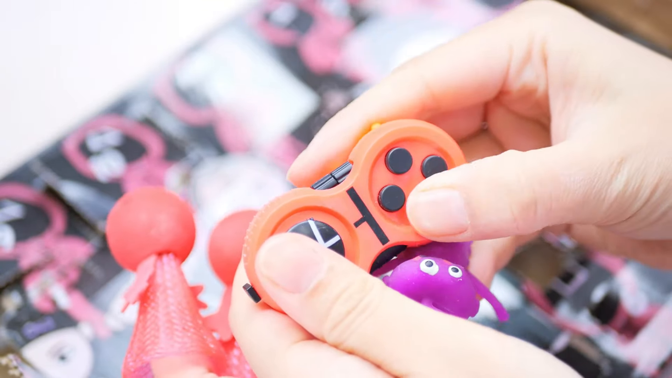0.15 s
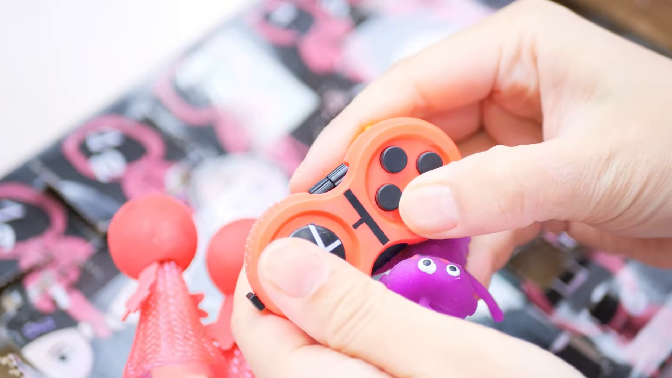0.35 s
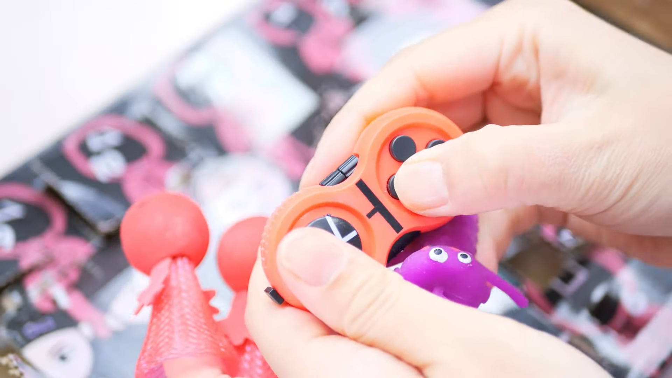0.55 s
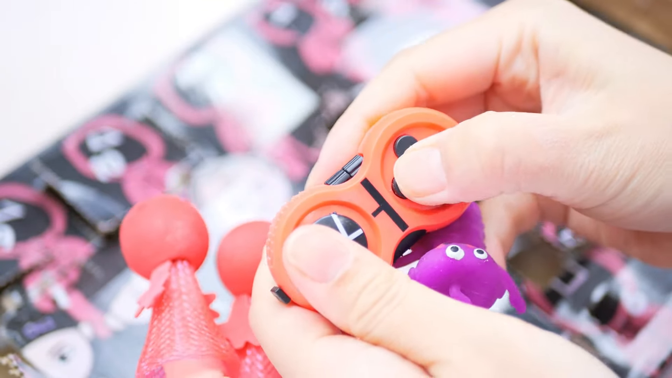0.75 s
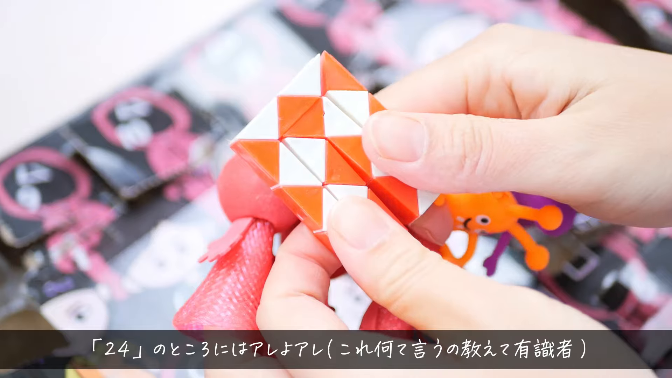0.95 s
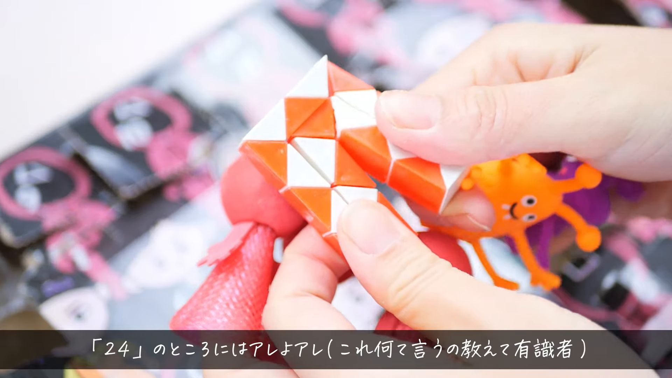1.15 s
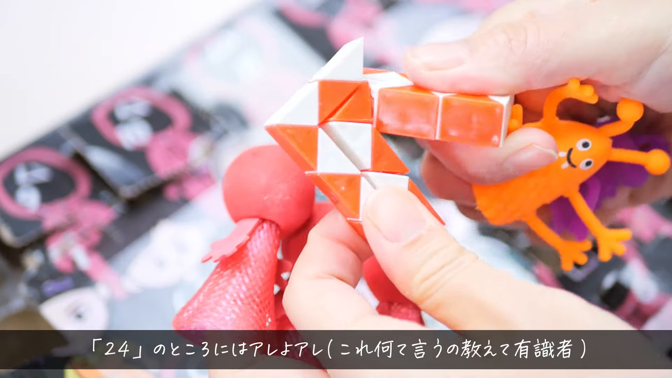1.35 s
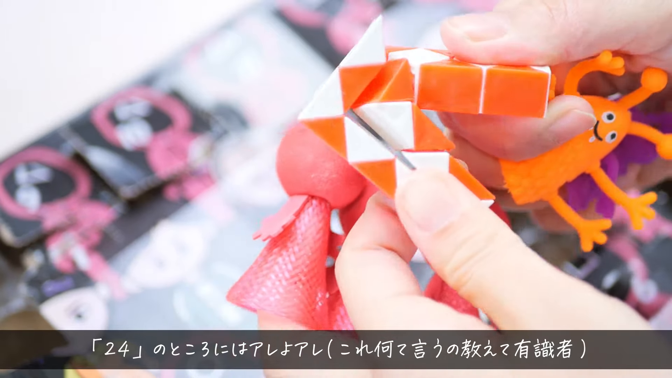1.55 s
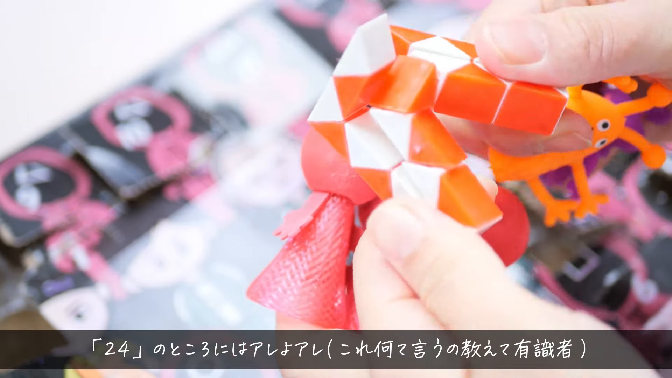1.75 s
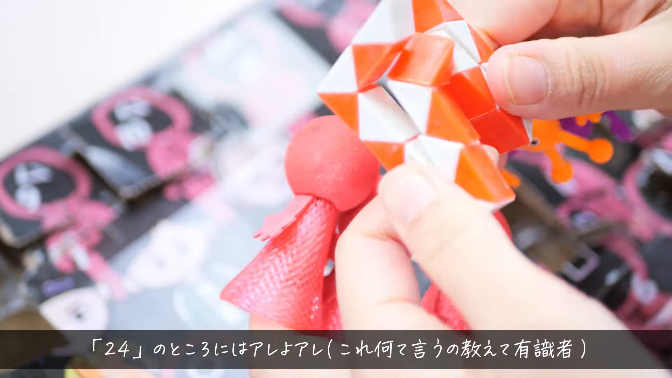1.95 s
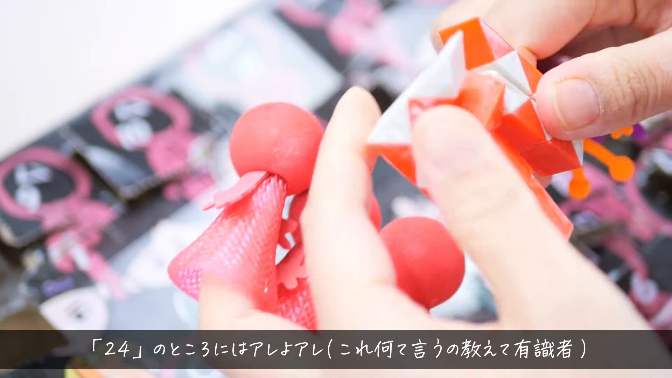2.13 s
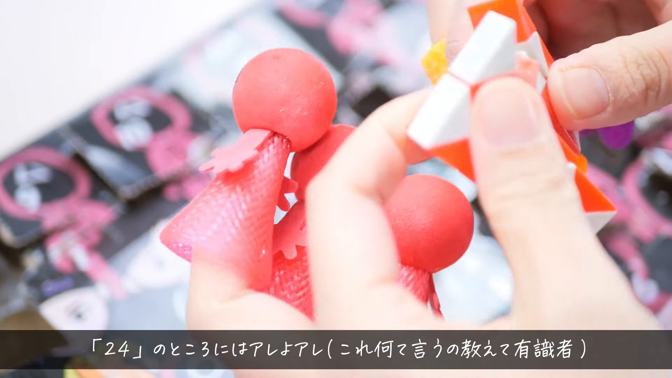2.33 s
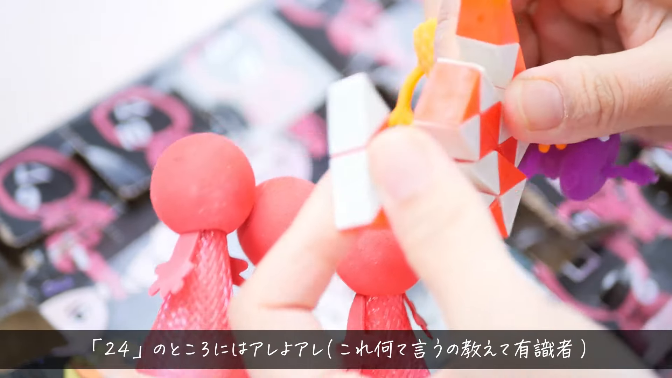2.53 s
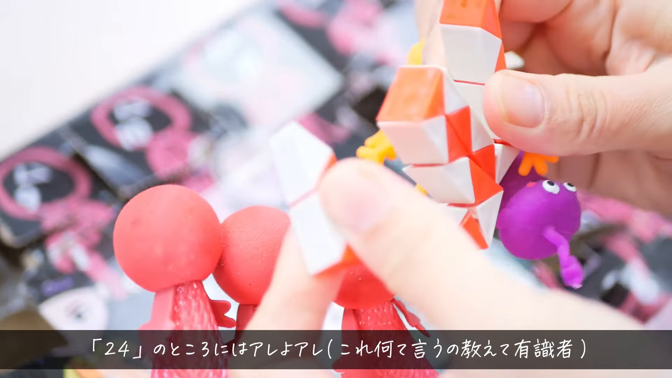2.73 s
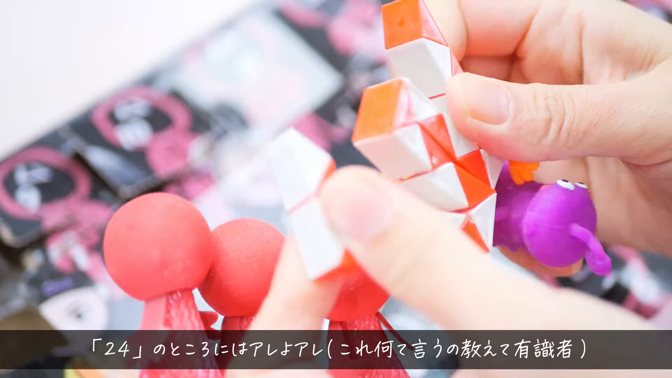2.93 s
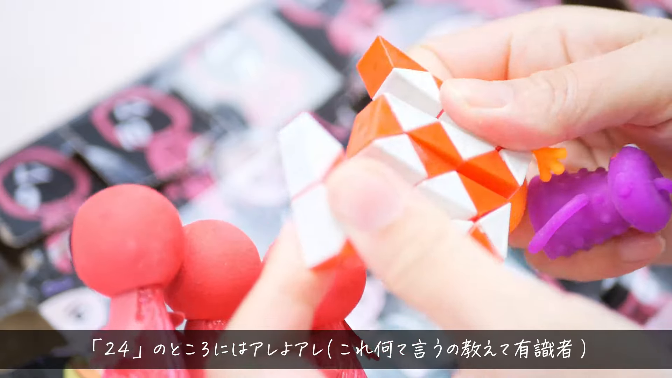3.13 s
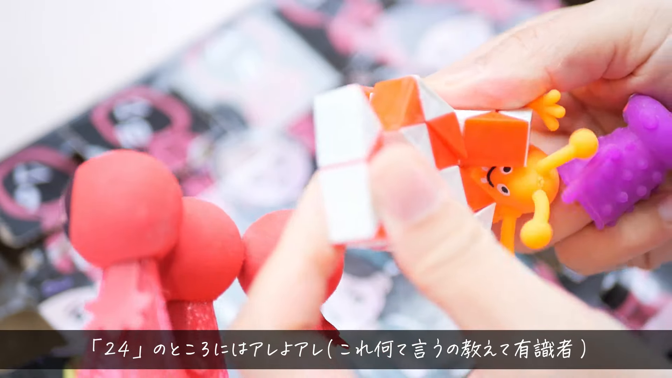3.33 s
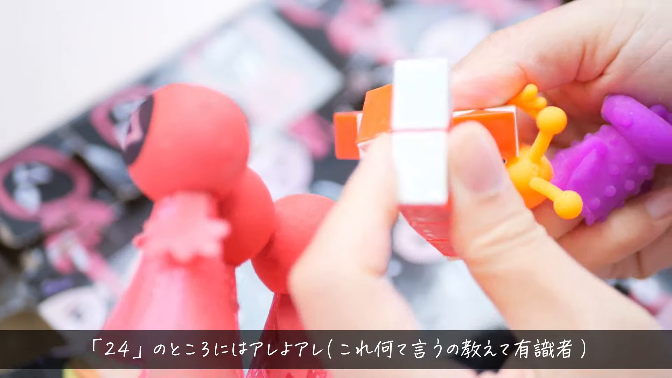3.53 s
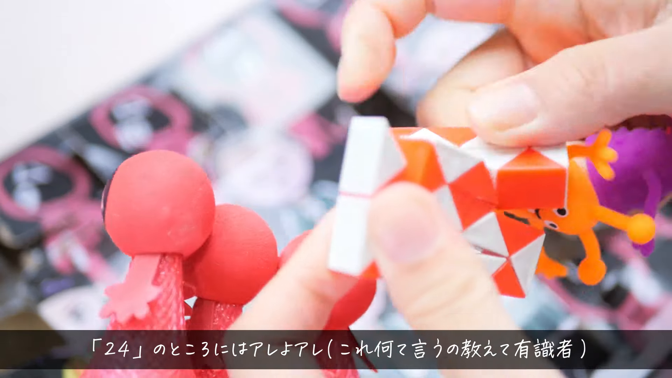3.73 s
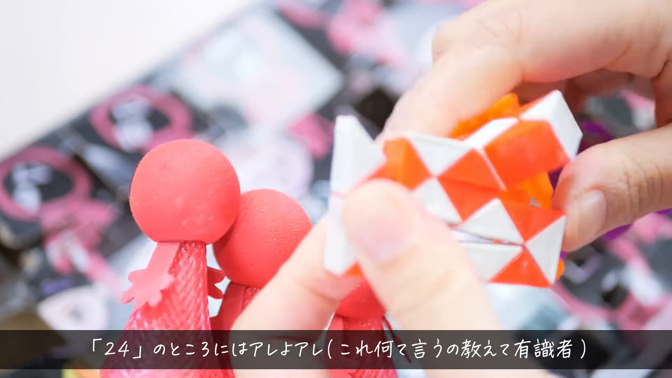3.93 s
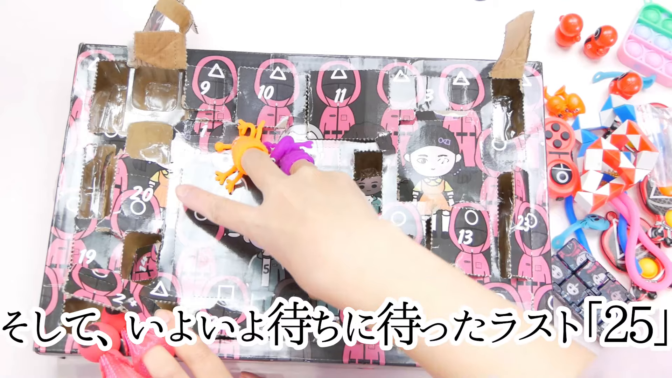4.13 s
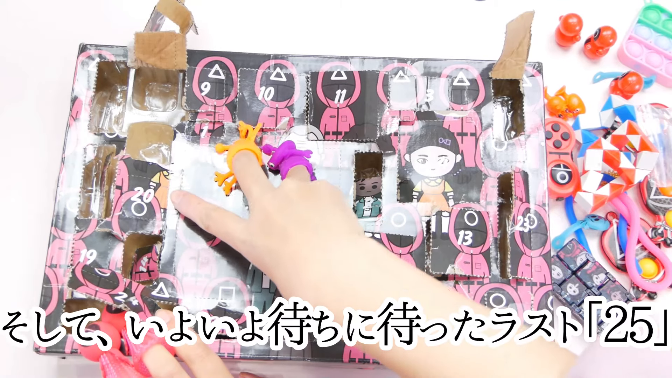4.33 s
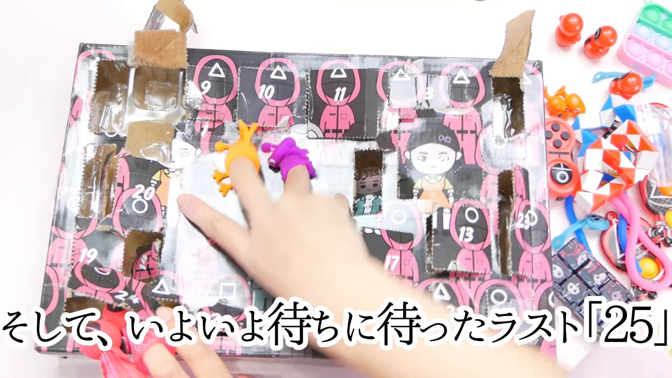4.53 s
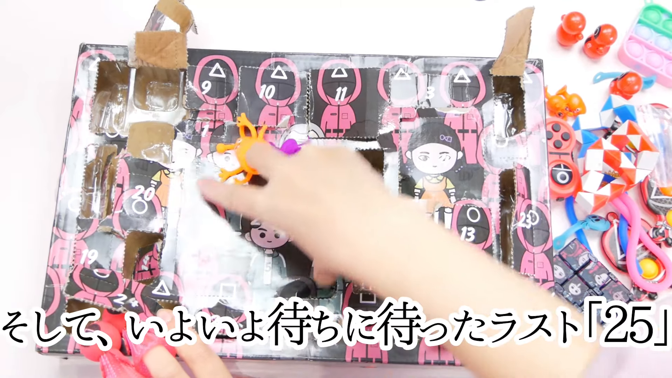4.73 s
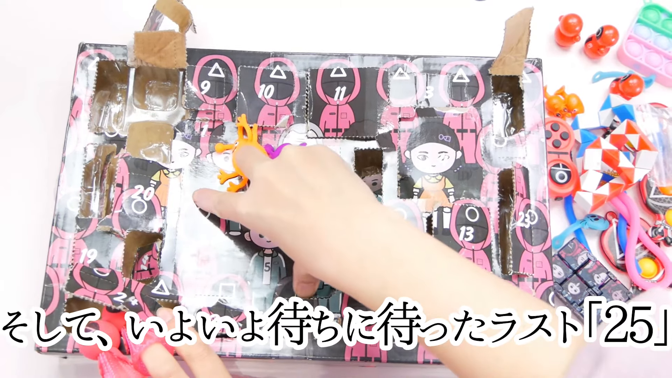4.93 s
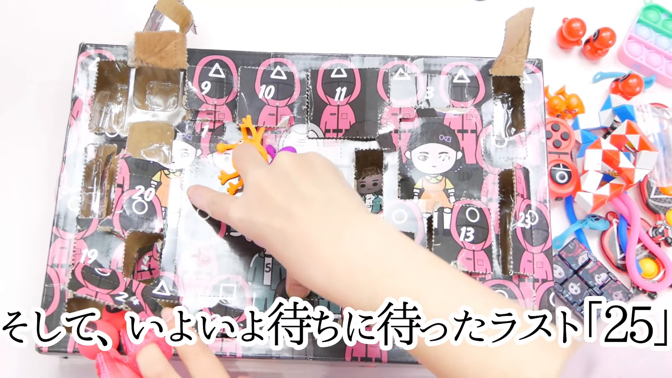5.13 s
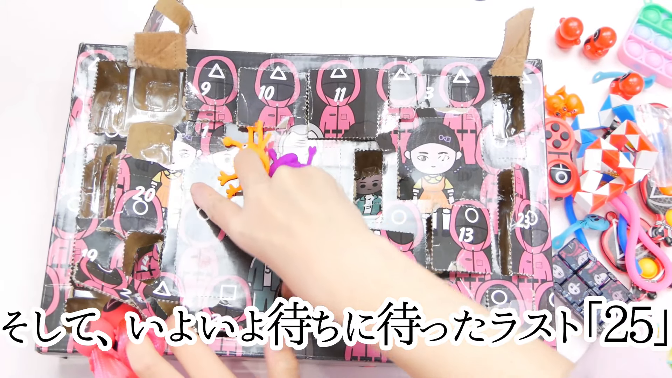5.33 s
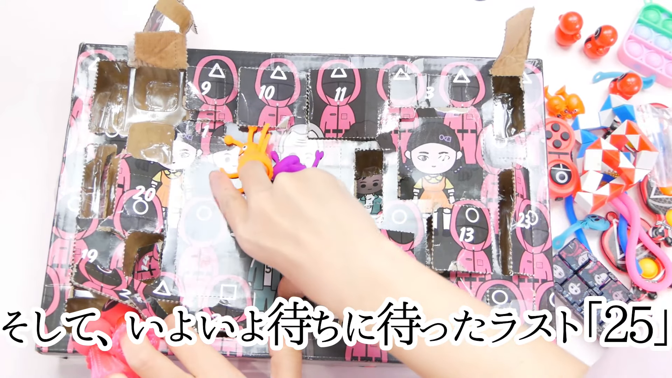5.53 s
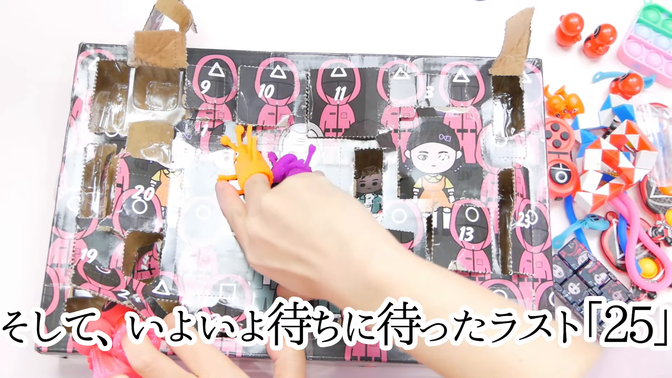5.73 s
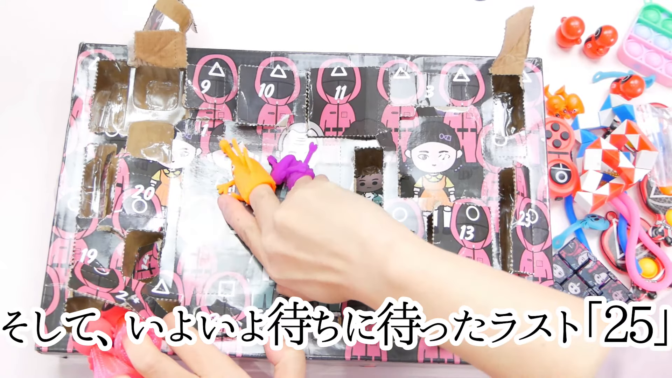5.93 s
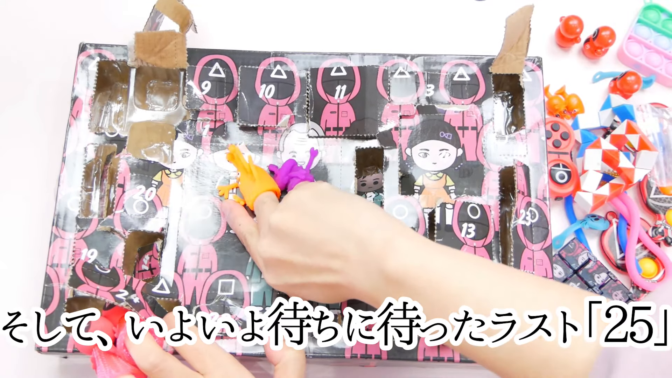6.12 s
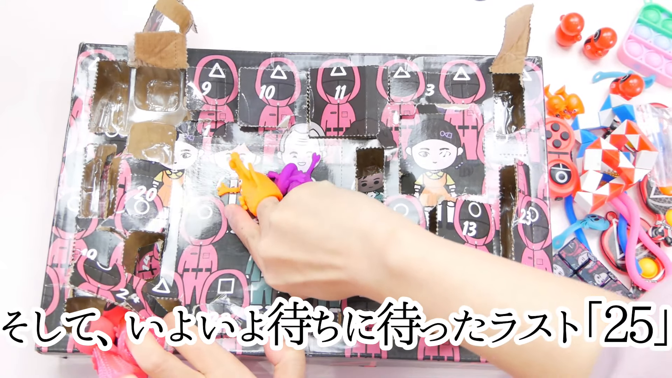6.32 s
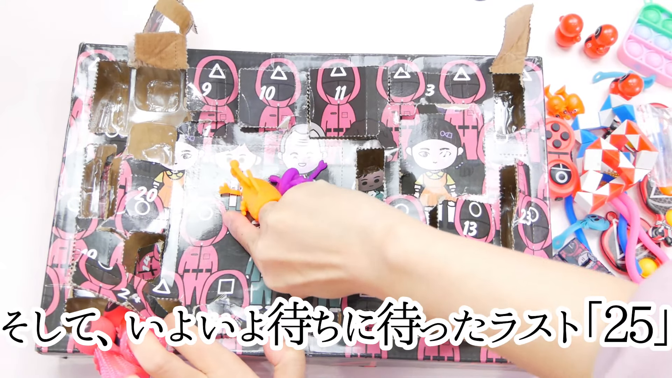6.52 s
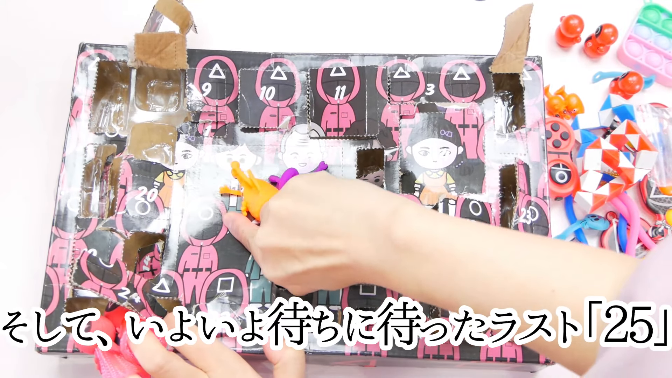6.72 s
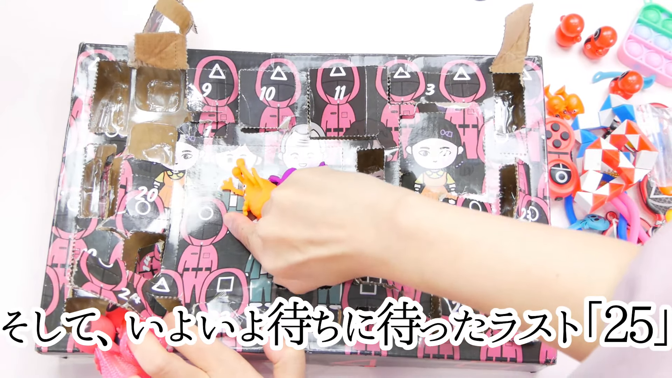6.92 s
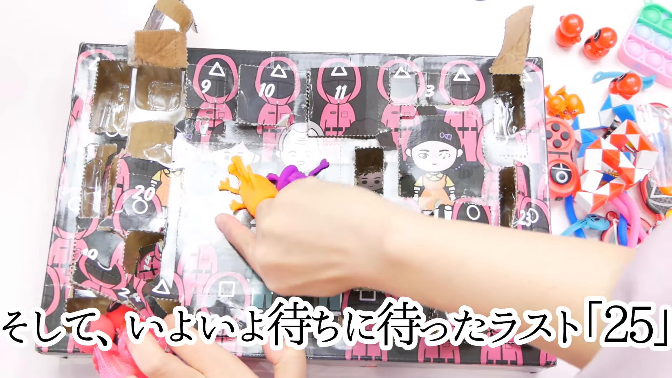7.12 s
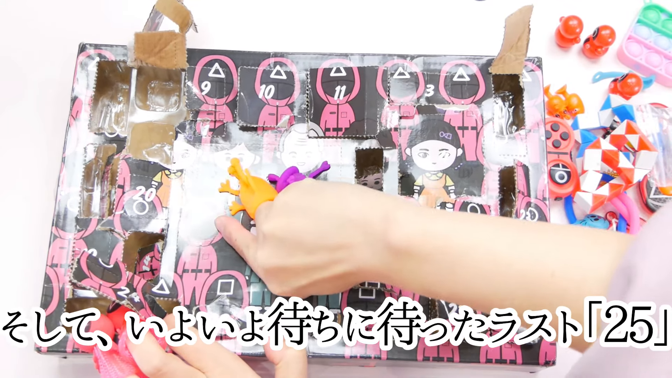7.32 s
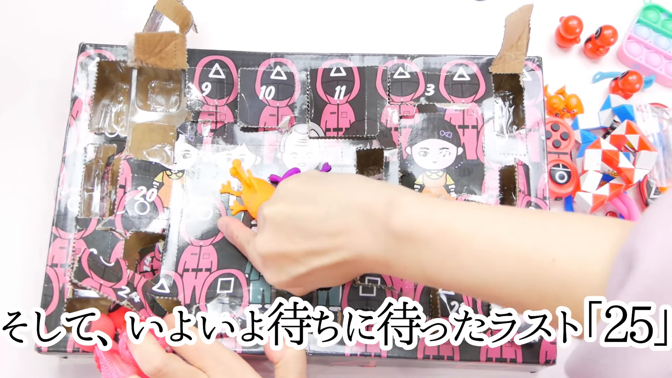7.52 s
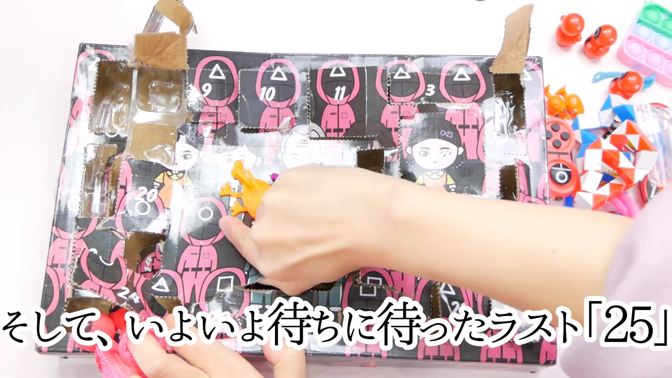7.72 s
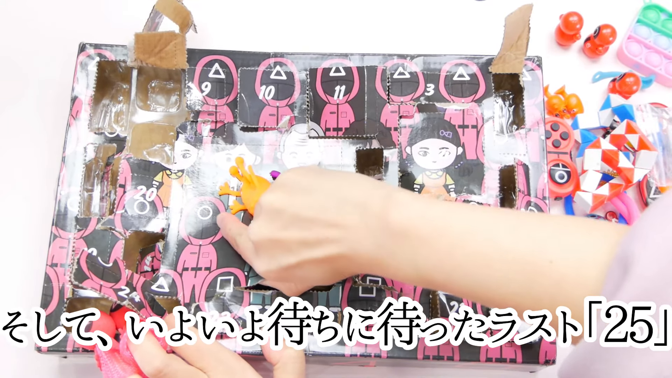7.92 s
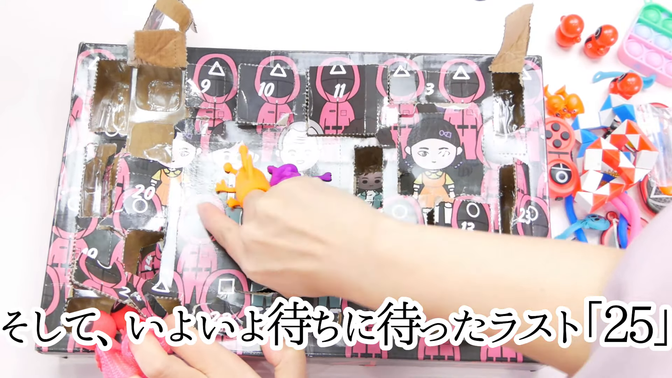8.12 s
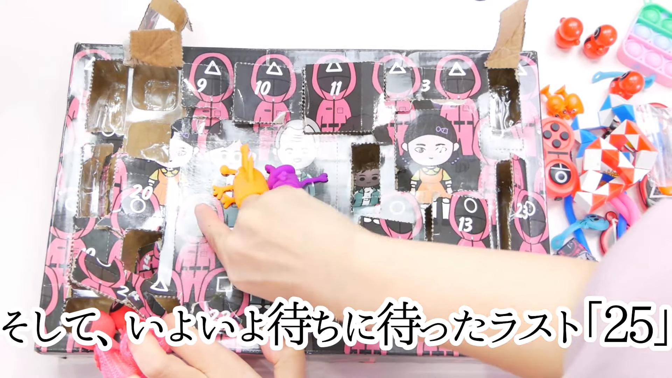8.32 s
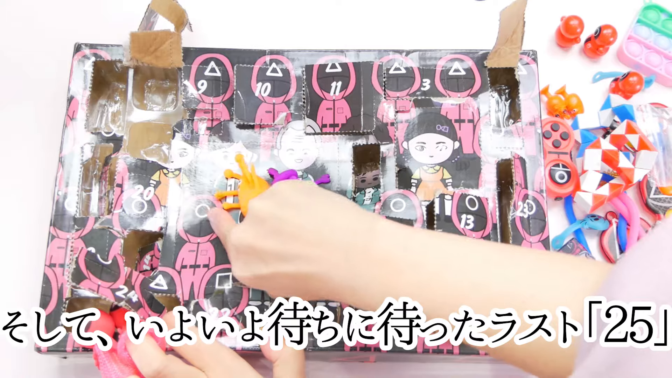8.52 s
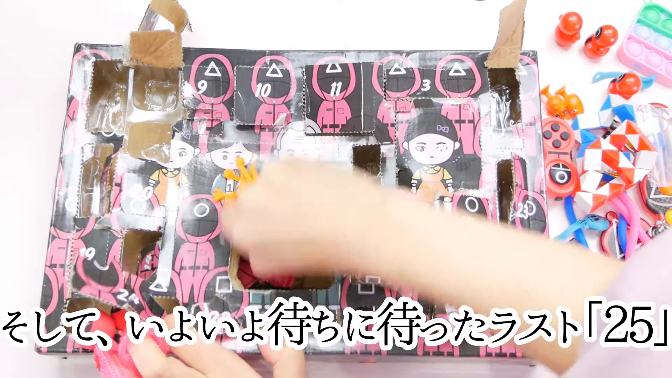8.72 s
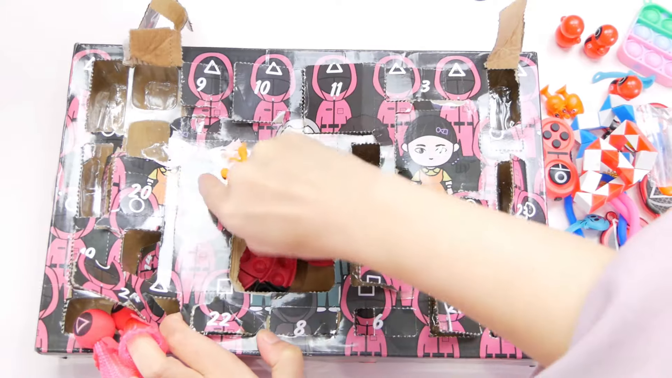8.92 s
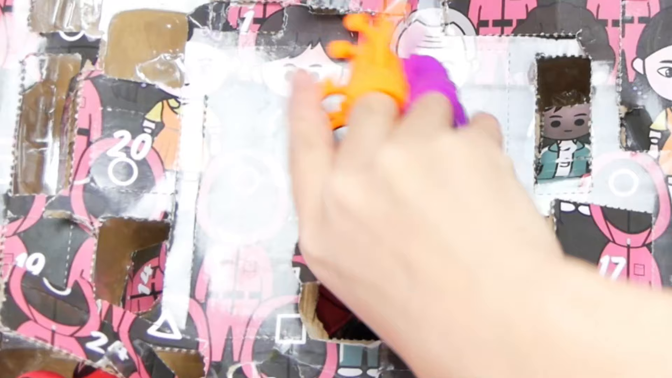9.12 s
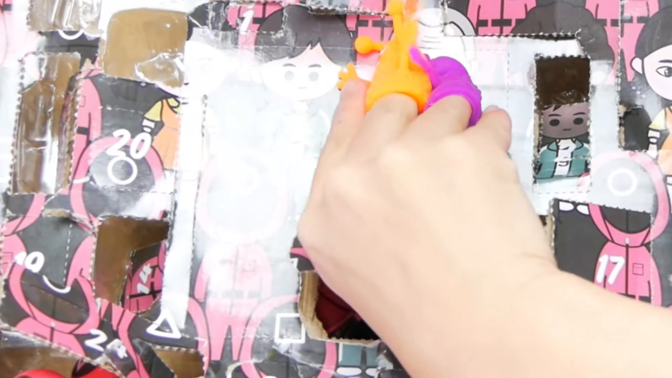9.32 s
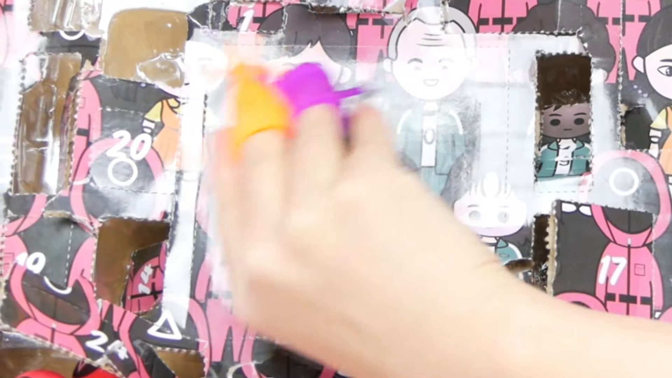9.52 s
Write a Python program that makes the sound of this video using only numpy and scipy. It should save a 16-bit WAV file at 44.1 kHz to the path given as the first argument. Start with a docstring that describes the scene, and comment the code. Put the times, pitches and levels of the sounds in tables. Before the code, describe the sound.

Small plastic buttons click, puzzle joints snap sharply in a quiet dry room, then a cardboard door cracks, rips and rustles loudly up close.

```python
"""In a small dry room, close to a stereo microphone, hands click the buttons of a plastic fidget pad,
then twist a snake puzzle whose joints tick and snap home: bursts of noise ringing shell modes.
Then a finger pushes in the perforated door of a cardboard calendar box, which cracks (damped panel pops),
tears and rustles (random fibre snaps); sliding hands and hiss are shaped noise.
The loudest snaps overload the microphone, and the room answers faintly."""
import sys
import numpy as np
from scipy import signal
from scipy.fft import rfft, irfft
from scipy.io import wavfile
from scipy.ndimage import uniform_filter1d, map_coordinates

SR = 44100
rng = np.random.default_rng(int(sys.argv[2]) if len(sys.argv) > 2 else 0)


def store_pcm(level_fs):
    """Save levels as 16-bit WAV."""
    pcm = np.round(np.clip(level_fs, -1, 1) * 32767).astype(np.int16)
    wavfile.write(sys.argv[1], SR, np.atleast_2d(pcm).T)


N = 421596
TIME = np.arange(N) / SR
STRIKE_SAMPLES = 4096
HZ = np.fft.rfftfreq(STRIKE_SAMPLES, 1 / SR)
BOX_START_S = 4.24

# Folds of card giving way: [t/s, panel level/dB, panel f/Hz, crisp edge level/dB]
CARD_CRACKS = [(4.266, -21.5, 1230, -34), (4.273, -15.5, 720, -26), (4.283, -9.5, 1210, -24),
               (4.331, -18, 880, -21.5), (4.387, -17, 1200, -18), (4.411, -22.5, 486, -19.5),
               (4.43, -18.5, 1280, -20.5), (4.45, -22.5, 354, -43), (4.533, -31, 1620, -18),
               (4.625, -14.5, 920, -20), (4.762, -9.5, 620, -21), (4.799, -24, 506, -44),
               (4.866, -23.5, 1030, -11.5), (5.171, -35, 745, -28), (5.216, -8, 1260, -14.5),
               (5.231, -23, 900, -25), (5.255, -7, 1670, -14.5), (5.306, -22.5, 960, -22),
               (5.333, -13.5, 1250, -10), (5.373, -17, 1240, -16.5), (5.469, -26.5, 1730, -19.5),
               (5.740, -18, 760, -22.5), (5.801, -21.5, 1780, -21.5), (5.835, -17, 880, -20),
               (5.853, -24.5, 2640, -13), (5.885, -8.5, 1380, -14), (5.892, -12, 1010, -13),
               (6.2436, -23.5, 704, -91), (6.309, -17.5, 870, -13.5), (6.463, -28, 1170, -47),
               (6.4923, -21, 960, -33), (6.625, -14, 480, -34), (6.723, -34, 423, -36),
               (7.18, -21, 870, -19.5), (7.312, -25.5, 1280, -25.5), (7.537, -21.5, 720, -53),
               (7.677, -22, 1160, -29.5), (7.69, -27.5, 830, -22.5), (7.725, -5, 514, -13),
               (8.171, -33, 770, -48), (8.619, -20.5, 646, -31), (8.654, -28.5, 520, -19),
               (8.743, -13, 1820, -28), (8.868, -29.5, 780, -34), (8.908, -24.5, 460, -15.5),
               (9.11, -19, 530, -20), (9.172, -18, 503, -21.5)]
# Rips along the perforation: [start t/s, length t/s, level/dB]
PERFORATION_RIPS = [(4.261, 0.057, -20), (4.36, 0.076, -21), (4.53, 0.082, -8), (4.659, 0.098, -9),
                    (5.248, 0.19, -24), (5.722, 0.024, -15.5), (5.835, 0.081, -26.5), (7.151, 0.01, -20),
                    (7.714, 0.039, -15), (8.596, 0.16, -23), (8.733, 0.053, -4), (8.881, 0.15, -19),
                    (9.097, 0.051, -21)]
# Every rip builds up, eases as the card yields, and dies away when the finger stops
RIP_ATTACK_S, RIP_SAG_DB_PER_S, RIP_RELEASE_DB_PER_S = 0.021, 26, 498.5
# The loosened flap goes on rustling after each rip, this far below it
FLAP_DB, FLAP_FADE_DB_PER_S = -30.5, 125
# Finger rubbing the box, breakpoints of its level: [t/s, level/dB]
FINGER_RUB = [(4.15, -51), (4.86, -37), (4.98, -59.5), (5.13, -50.5), (5.3, -24), (5.53, -43),
              (5.94, -38.5), (6.15, -45), (7.0, -51.5), (7.05, -42), (7.4, -41.5), (7.88, -66),
              (7.97, -45.5), (8.4, -48.5), (8.85, -31.5), (9.27, -49)]
# Glossy coating creasing with a sharp tick: [t/s, level/dB, ring f/Hz]
COATING_TICKS = [(4.463, -19.5, 3970), (4.73, -14.5, 3260), (4.83, -38, 4800), (5.06, -48.5, 2090),
                 (5.359, -18, 2710), (5.436, -39, 3000), (5.595, -25.5, 4400), (5.609, -21.5, 4134),
                 (5.683, -38, 2300), (5.734, -16.5, 3020), (5.778, -23.5, 2030), (5.875, -22, 6900),
                 (6.0625, -21, 2480), (6.093, -24, 2750), (6.126, -22.5, 1760), (6.133, -24, 4970),
                 (6.553, -21, 3040), (6.635, -24.5, 2690), (6.84, -34, 6420), (6.867, -32, 7000),
                 (7.032, -34.5, 2820), (7.106, -18, 3380), (7.139, -31, 3280), (7.264, -37, 6300),
                 (7.409, -32.5, 11300), (7.468, -29.5, 11800), (7.483, -31, 3600), (7.528, -17.5, 4670),
                 (7.609, -36.5, 3460), (7.914, -38.5, 7900), (8.109, -21, 3780), (8.53, -37, 4900),
                 (8.707, -20.5, 3240), (8.995, -21, 5550), (9.208, -16.5, 6660), (9.513, -30, 6300)]
# Puzzle joints snapping home, with rebounds:
# [t/s, level/dB, t60/s, low mode f/Hz, high mode f/Hz, high mode level/dB, broad tick level/dB]
JOINT_SNAPS = [(1.2543, -1, 0.013, 5340, 7240, 19.5, -5.5), (1.2742, -10.5, 0.01, 5540, 6300, 0.5, -24.5),
               (1.7701, -4, 0.084, 5170, 7520, 5.5, -22.5), (1.8183, -25.5, 0.0059, 5060, 7800, 16, -3.5),
               (2.4971, -29.5, 0.009, 4030, 6620, -16, -4), (2.6158, -23.5, 0.0042, 4930, 6740, -1, -11.5),
               (2.6267, -13, 0.0084, 5000, 6710, -8, -40), (3.2341, -7, 0.032, 3500, 6480, -1.5, -27.5),
               (4.034, -28, 0.0088, 4870, 8170, -6.5, -15)]
# Pad buttons going down and up: same columns as the joints
BUTTON_CLICKS = [(.0455, -21, .012, 2640, 7200, -11.5, -25), (.1927, -18.5, 0.013, 5640, 7480, 1.5, -11.5),
                 (.5348, -21, 0.011, 3000, 7700, -12.5, -22.5), (.6943, -29, 0.011, 2850, 6000, 2, -17.5),
                 (.7250, -48, .17, 2650, 5900, -23, -26), (.8152, -17, 0.0072, 3020, 5800, -12, -34),
                 (.9648, -24, 0.013, 3130, 5950, 5, -18)]
# Light touches of plastic on plastic, too weak to ring the shell: [t/s, level/dB, ring f/Hz]
PLASTIC_TOUCHES = [(.42, -51, 3670), (.4438, -45, 2900), (.4538, -41.5, 2720), (.512, -55, 1900),
                   (.7712, -57, 1960), (1.013, -51.5, 4550), (1.134, -44, 3800), (1.395, -46.5, 910),
                   (1.431, -57, 7370), (2.0645, -41, 3060), (2.245, -52.5, 1910), (2.483, -50, 7600),
                   (3.22, -43, 2410), (4.1586, -42.5, 1455)]
# Plastic faces sliding on each other and on skin: [middle t/s, length t/s, level/dB]
PLASTIC_SLIDES = [(1.12, 0.059, -51.5), (1.628, 0.031, -54.5), (1.949, 0.035, -49), (2.087, 0.076, -48),
                  (2.31, 0.11, -49.5), (2.436, 0.028, -54), (2.908, 0.056, -47), (3.765, 0.09, -45),
                  (4.074, 0.1, -45)]
# Hand sweeping over the glossy lid: [middle t/s, length t/s, level/dB]
LID_SWEEPS = [(9.41, 0.14, -39.5), (9.54, 0.056, -31.5)]
# Fingers shifting their grip on the toys: [middle t/s, length t/s, level/dB]
GRIP_SHIFTS = [(1.115, 0.067, -56.5), (1.33, 0.14, -55.5), (2.3, 2.2, -77)]

# Relative spectra, all [f/Hz, level/dB per Hz]
# crisp edge of creasing card
CRISP_SPECTRUM = [(300, -14.5), (1500, -6.5), (5500, -10.5), (15500, -22)]
# tearing fibres
FIBRE_SPECTRUM = [(300, -29.5), (1200, -11), (2300, -8.5), (4500, -17), (9000, -17.5), (15500, -26)]
# hollow box drummed on
BOX_SPECTRUM = [(40, -14), (220, 17), (450, 21.5), (800, 22.5), (1300, 9.5), (2500, 10), (8000, -24)]
# skin on printed card
SKIN_SPECTRUM = [(60, -12), (250, 3.5), (550, 3.5), (1200, -1.5), (5200, -19.5), (15500, -18)]
# plastic shell
PLASTIC_SPECTRUM = [(100, -9.5), (800, -12), (2700, 2), (7000, 6.5), (16000, 4)]
# plastic faces sliding
SLIDE_SPECTRUM = [(100, -8), (1600, -12.5), (3600, 2.5), (9000, 2), (16000, -1)]
# hand on the glossy lid
GLOSS_SPECTRUM = [(150, -5.5), (450, 4.5), (1200, -1.5), (1800, 4), (3300, -7), (5200, 1), (6800, -6),
                  (15500, -10.5)]
# palm and fingers gripping
PALM_SPECTRUM = [(60, -11.5), (400, -13.5), (8000, -55.5)]
# microphone hiss and rumble
HISS_SPECTRUM = [(15, -33), (25, 12), (86, -12), (221, -10.5), (523, -25.5), (6380, -17.5), (15500, -19)]


def cracks(sharpness=2.03, broader_when_high=0.73, ring_t60=0.035, longer_when_loud=0.062,
           longer_when_low=0.3, crisp_share=0.44, drum_db=-26, clean=0.8):
    """A fold gives way: a crisp edge sound, and a damped pop from the panel behind it."""
    out = np.zeros((2, N))
    for s, panel_db, hz, crisp_db in CARD_CRACKS:
        # loud, low folds ring longer
        t60 = ring_t60 * amp(panel_db) ** longer_when_loud * (1000 / hz) ** longer_when_low
        width = hz / sharpness * (hz / 1000) ** broader_when_high
        # the sharper the crack, the more it also drums on the box
        drum = amp(drum_db + .5 * (crisp_db - panel_db)) * read(BOX_SPECTRUM)
        panel = mode(hz, width) ** 2 + drum
        # the panel snaps through at once; its chatter needs about half a cycle to start
        pop = strike(panel * patchy(), t60, rise=.5 / hz, clean=clean)
        add(out, s, amp(panel_db) * pop)
        edge = strike(read(CRISP_SPECTRUM) * patchy(), t60 * crisp_share)
        add(out, s, amp(crisp_db) * edge)
    return out


def tears(fibre_db=-2.5, box_db=-7):
    """Dense fibre snaps run along the perforation in jerks and drum on the hollow box."""
    pull = sum(rip(*row) for row in PERFORATION_RIPS) * catching(depth_db=2.9, per_s=190)
    fibres = crackle(FIBRE_SPECTRUM, per_s=800, spread_db=5.2, t60=.007, ring=3)
    box = crackle(BOX_SPECTRUM, per_s=520, spread_db=3, t60=.018, ring=2, count=4)
    return pull * flexing(amp(fibre_db) * fibres + amp(box_db) * box)


def rip(start, length, db):
    """Pull of the finger in one rip: attack, sagging hold, release, and the flap's slower fade."""
    t = np.maximum(TIME - start, 0)
    after = np.maximum(t - length, 0)
    attack = np.minimum(t / RIP_ATTACK_S, 1)
    hold = attack * amp(db - RIP_SAG_DB_PER_S * np.minimum(t, length))
    release = amp(-RIP_RELEASE_DB_PER_S * after)
    flap = amp(FLAP_DB - FLAP_FADE_DB_PER_S * after)
    return hold * (release + flap)


def rustle(rub_db=-5.0, ticks_db=-7, pops_db=-7):
    """Skin catches and slips on the printed card; the card answers with clumps of creases and pops."""
    level = amp(np.interp(TIME, *np.transpose(FINGER_RUB), left=-120))
    slips = crackle(SKIN_SPECTRUM, per_s=600, spread_db=4, t60=.016, ring=2, count=3)
    skin = slips * catching(depth_db=2.5, per_s=45)
    creases = crackle(CRISP_SPECTRUM, per_s=70, spread_db=3, t60=.006, ring=3, count=5)
    clumped = creases * catching(depth_db=3, per_s=22)
    pops = crackle(SKIN_SPECTRUM, per_s=16, spread_db=2.5, t60=.02, ring=8, count=3)
    return level * flexing(amp(rub_db) * skin + amp(ticks_db) * clumped + amp(pops_db) * pops)


def crackle(spectrum, per_s, spread_db, t60, ring, count=8):
    """Fibres snap at random, a few of them large; each patch of card has its own resonance."""
    out = np.zeros((2, N))
    for hz in np.geomspace(450, 7000, count):
        size = amp(spread_db * np.minimum(rng.exponential(1, N), 3.5))
        happens = rng.random(N) < per_s / count / SR
        snaps = size * rng.choice([-1, 1], N) * happens
        resonance = mode(hz * rng.uniform(1.0, 1.1), hz / 3)
        grain = strike(read(spectrum) * (1 + ring * resonance), t60)
        out += signal.oaconvolve(snaps[None], grain, axes=1)[:, :N]
    return evened(out)


def flexing(x, depth_db=3.4, patch_hz=380, patch_s=.02):
    """The card bends as it gives way, so its resonances keep shifting."""
    hz, t, z = signal.stft(x, SR, nperseg=512, noverlap=384)
    # patches of colour widen with frequency
    place = np.meshgrid(np.log1p(hz / (4 * patch_hz)) * 8, t / patch_s, indexing="ij")
    knots = rng.standard_normal([int(axis.max()) + 2 for axis in place])
    drift = evened(map_coordinates(knots, place, order=1))
    colour = amp(depth_db * np.clip(drift, -2, 2))
    # keep the overall level roughly steady
    power = (abs(z) ** 2).mean((0, 2))
    colour /= np.sqrt(np.average(colour ** 2, axis=0, weights=power))
    return signal.istft(z * colour, SR, nperseg=512, noverlap=384)[1][:, :N]


def ticks(rows, spectrum, sharpness, broad_db, t60, overtone=1.6, overtone_db=-6):
    """Short dry ticks, each with a ring of its own and one overtone."""
    out = np.zeros((2, N))
    for s, db, hz in rows:
        width = hz / sharpness
        ring = mode(hz, width) ** 2 + amp(overtone_db) * mode(overtone * hz, width) ** 2
        gain = (ring + amp(broad_db)) * read(spectrum) * patchy()
        add(out, s, amp(db) * strike(gain, t60))
    return out


def plastic(rows, low_width, high_width, order, ring_db, ring_t60, ring_width=1100,
            hollow_hz=1650, hollow_db=-3):
    """Each click rings two modes of a hollow shell over a broad tick; the shell lingers faintly."""
    out = np.zeros((2, N))
    for s, db, t60, low_hz, high_hz, high_db, tick_db in rows:
        low = mode(low_hz, low_width) ** order
        high = amp(high_db) * mode(high_hz, high_width) ** order
        modes = np.hypot(low, high)
        click = np.hypot(modes, amp(tick_db) * patchy())
        add(out, s, amp(db) * strike(read(PLASTIC_SPECTRUM) * click, t60))
        # the lingering ring: both modes at one shared width, and the hollow of the shell
        ring = mode(low_hz, ring_width) + amp(high_db) * mode(high_hz, ring_width)
        ring = ring + amp(hollow_db) * mode(hollow_hz, hollow_hz / 4)
        linger = strike(read(PLASTIC_SPECTRUM) * ring * patchy(), ring_t60)
        add(out, s, amp(db + ring_db) * linger)
    return out


def slides(rows, spectrum):
    """Finely grained friction hiss swells and fades with each stroke."""
    level = sum(amp(db) * np.exp(-np.pi * ((TIME - s) / length) ** 2) for s, length, db in rows)
    return level * pair(N, spectrum) * catching(depth_db=3.3, per_s=220)


def room(x, early_db, late_db, early_t60=0.05, late_t60=0.13):
    """Quick echoes from the table and hands, then a faint short tail, as decaying noise."""
    t = TIME[:SR // 2]
    tail = np.zeros((2, len(t)))
    for db, t60 in [(early_db, early_t60), (late_db, late_t60)]:
        taps = pair(len(t)) * amp(-60 * t / t60) * (t > .003)
        tail += amp(db) * taps / np.linalg.norm(taps[0])
    return x + signal.oaconvolve(x, tail, axes=1)[:, :N]


def hiss(floor_db=-66, opening_db=-3, opening_s=.99):
    """Steady microphone hiss and faint rumble; the first second is quieter."""
    return amp(floor_db + opening_db * (TIME < opening_s)) * pair(N, HISS_SPECTRUM)


def strike(gain, t60, rise=0.00036, clean=0):
    """A dying burst of micro-slips, led by an optional clean blow, rings a body with this gain curve."""
    t = TIME[:STRIKE_SAMPLES]
    burst = pair(STRIKE_SAMPLES) * (1 - np.exp(-t / rise)) * amp(-60 * t / max(t60, .001))
    z = rfft(burst)
    z = z + clean * np.sqrt(np.mean(abs(z) ** 2))
    # the body, not the burst, sets the broad colour
    power = abs(z.mean(0)) ** 2 + (abs(z) ** 2).mean(0)
    own = np.sqrt(uniform_filter1d(power, size=31))
    log_gain = np.log(np.maximum(gain / gain.max(), 1e-5) / own)
    # minimum phase: the body answers only after the blow
    circle = np.concatenate([log_gain, log_gain[-2:0:-1]])
    causal = np.exp(np.conj(signal.hilbert(circle)))[:len(HZ)]
    # energy of 10 ms at rms 1
    return evened(irfft(z * causal)) * np.sqrt(SR / 100 / STRIKE_SAMPLES)


def mode(hz, width):
    """Gain of one resonance, 1 at its top; centre and width in Hz."""
    return HZ * width / np.hypot(HZ ** 2 - hz ** 2, HZ * width)


def patchy(depth_db=3.5, step_hz=450):
    """Every spot struck has its own uneven colour."""
    knots = np.arange(0, SR, step_hz)
    return amp(depth_db * np.interp(HZ, knots, rng.standard_normal(len(knots))))


def catching(depth_db, per_s):
    """Stick and slip: a gain that rises and falls at random, of rms 1."""
    knots = np.arange(0, TIME[-1] + 1, 1 / per_s)
    heights = np.clip(rng.standard_normal(len(knots)), -2, 2)
    return evened(amp(depth_db * np.interp(TIME, knots, heights)))


def pair(size, spectrum=None, alike_hz=1250):
    """Noise at two spaced capsules: alike in the bass, unrelated in the treble."""
    hz = np.fft.rfftfreq(size, 1 / SR)
    a, b = rfft(rng.standard_normal((2, size)))
    same = .95 / (1 + (hz / alike_hz) ** 3)
    z = np.array([a, same * a + np.sqrt(1 - same ** 2) * b])
    colour = read(spectrum, hz) if spectrum else 1
    return evened(irfft(z * colour, size))


def read(points, hz=HZ):
    """Gain of a spectrum table on a log-frequency axis."""
    f, db = np.transpose(points)
    return amp(np.interp(np.log(hz + 1), np.log(f), db))


def amp(db):
    """Decibels to gain."""
    return 10 ** (np.asarray(db) / 20)


def evened(x):
    """Scales to rms 1."""
    return x / np.sqrt(np.mean(x ** 2) + 1e-20)


def add(mix, s, sound):
    """Mixes a stereo sound in at time s."""
    part = mix[:, round(s * SR):][:, :sound.shape[1]]
    part += sound[:, :part.shape[1]]


def scene():
    """The box, the puzzle and the pad, handled over a quiet floor."""
    creases = ticks(COATING_TICKS, CRISP_SPECTRUM, sharpness=4.2, broad_db=-8.5, t60=0.014)
    card = cracks() + creases + tears() + rustle()
    box = room(card, early_db=-16, early_t60=0.11, late_db=-21)
    joints = plastic(JOINT_SNAPS, low_width=730, high_width=1500, order=1, ring_db=-24.5, ring_t60=.07)
    puzzle = room(joints, early_db=-15.0, late_db=-12.0)
    buttons = plastic(BUTTON_CLICKS, low_width=700, high_width=450, order=2, ring_db=-20.5, ring_t60=0.11)
    touches = ticks(PLASTIC_TOUCHES, PLASTIC_SPECTRUM, sharpness=1.5, broad_db=-17.5, t60=0.0101)
    pad = room(buttons + touches, early_db=-21.5, late_db=-21.0)
    hands = slides(PLASTIC_SLIDES, SLIDE_SPECTRUM) + slides(LID_SWEEPS, GLOSS_SPECTRUM)
    hands = hands + slides(GRIP_SHIFTS, PALM_SPECTRUM)
    return box + puzzle + pad + hands + hiss()


def record(dry, toy_ceiling_db=0, box_ceiling_db=-8, lopsided=0.23, dc_cut_hz=12, thump_db=-11,
           thump_hz=38, edge_hz=16000):
    """Overload flattens the peaks, one side sooner, and leaves a low thump; the box has a lower ceiling."""
    ceiling_db = np.where(TIME < BOX_START_S, toy_ceiling_db, box_ceiling_db)
    ceiling = amp(ceiling_db) * (1 - lopsided * (dry > 0))
    flat = dry / (1 + (dry / ceiling) ** 4) ** (1 / 4)
    excess = np.maximum(abs(dry) - ceiling, 0)
    thump_band = signal.butter(1, [thump_hz / 2, thump_hz], "band", fs=SR)
    thump = signal.lfilter(*thump_band, excess)
    dc_cut = signal.butter(1, dc_cut_hz, "high", fs=SR)
    flat = signal.lfilter(*dc_cut, flat - amp(thump_db) * thump)
    # the treble ends at edge_hz
    edge = signal.firwin(255, edge_hz, window=("kaiser", 7), fs=SR)
    return signal.oaconvolve(flat, edge[None], "same", axes=1)


dry = scene()
out = record(dry)
store_pcm(out)
```